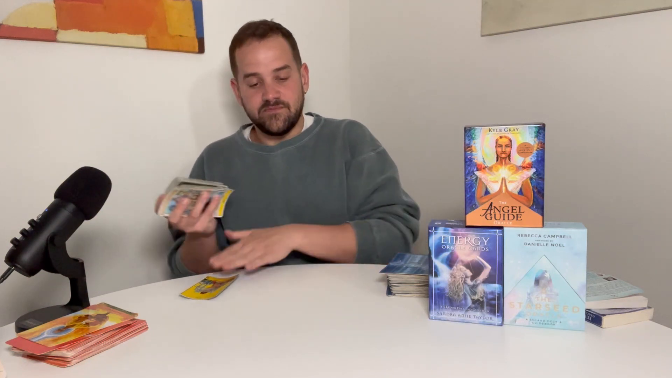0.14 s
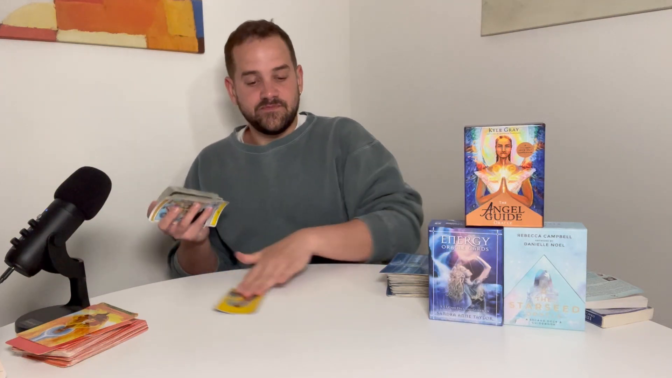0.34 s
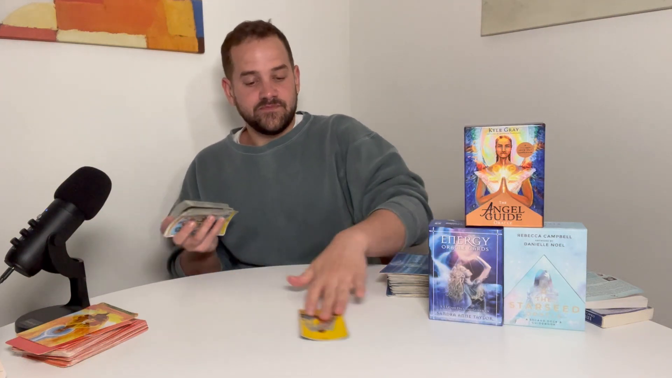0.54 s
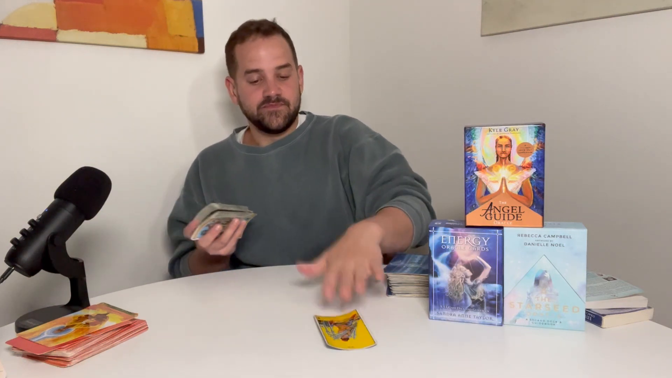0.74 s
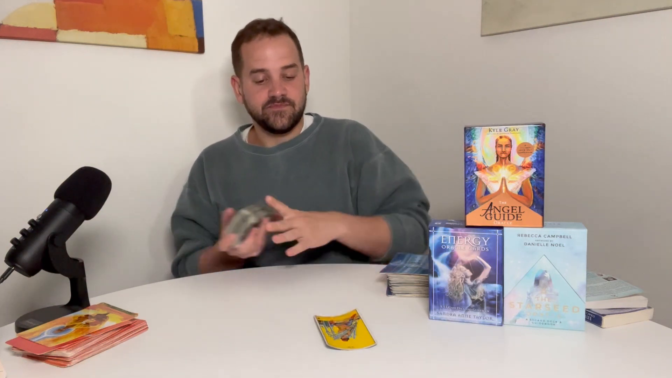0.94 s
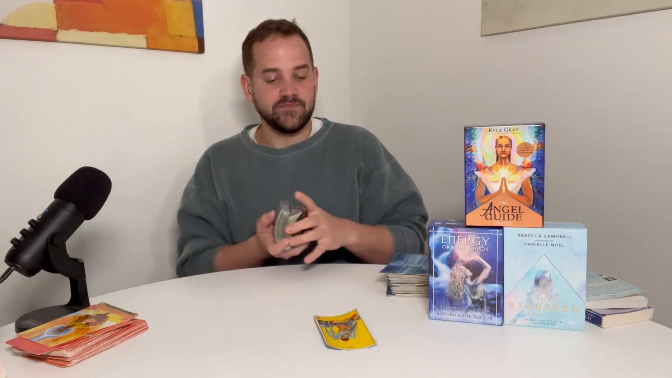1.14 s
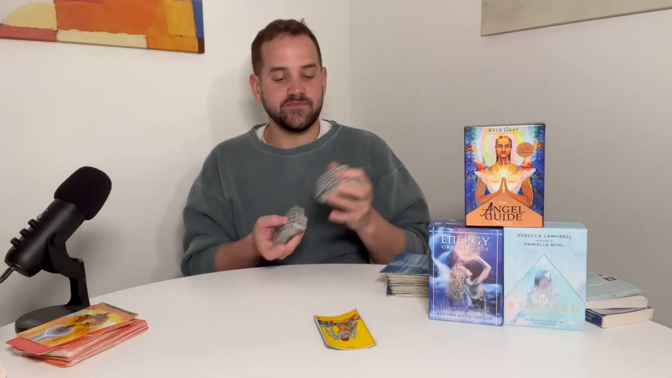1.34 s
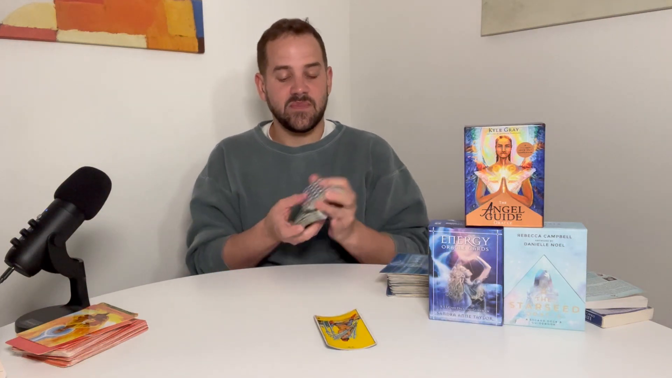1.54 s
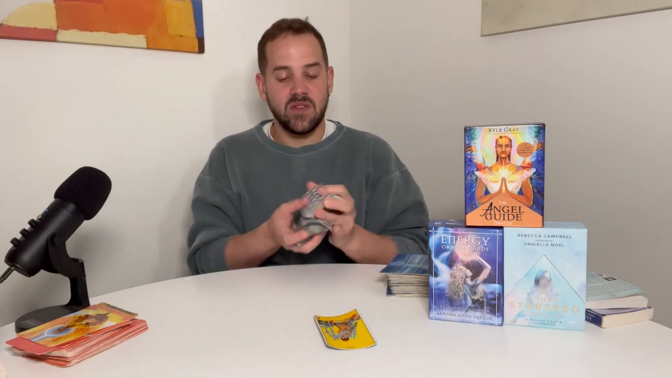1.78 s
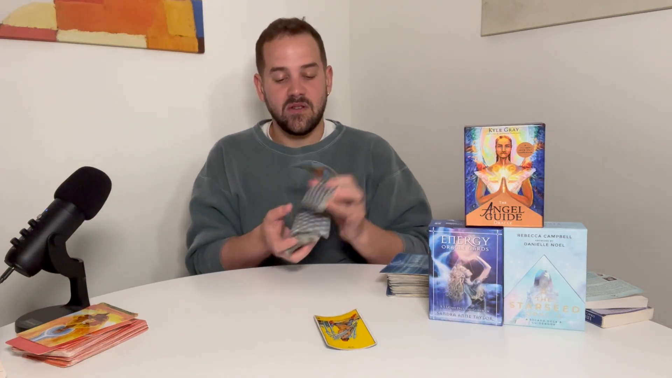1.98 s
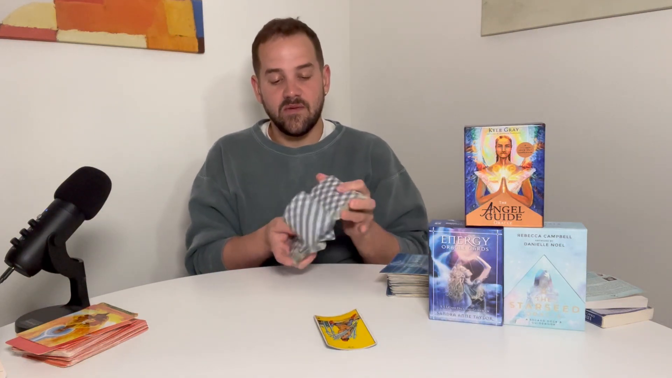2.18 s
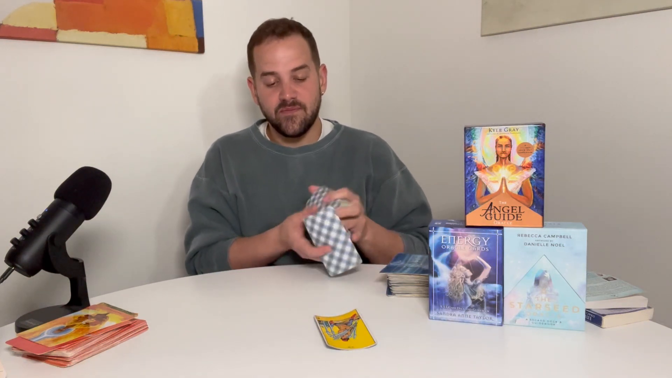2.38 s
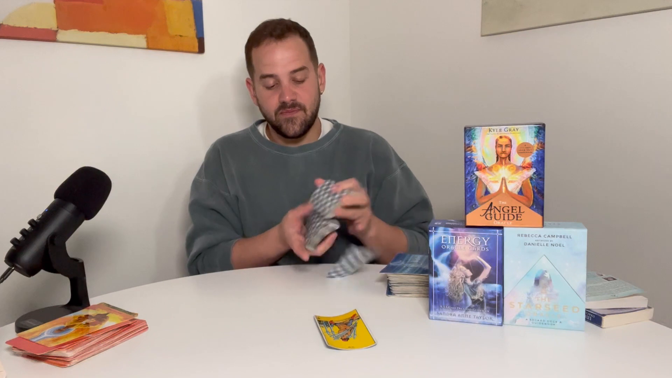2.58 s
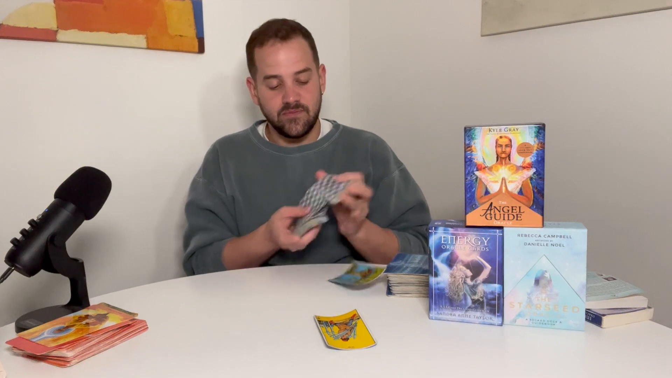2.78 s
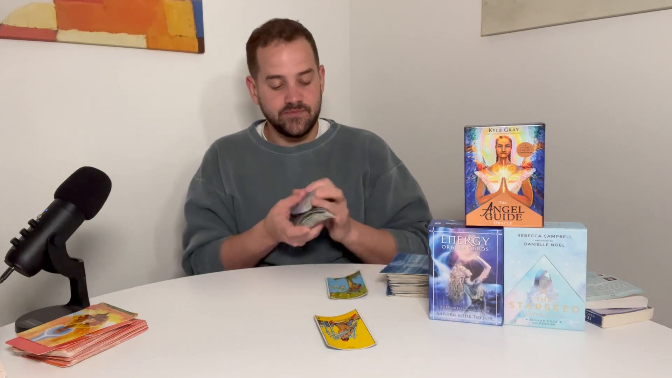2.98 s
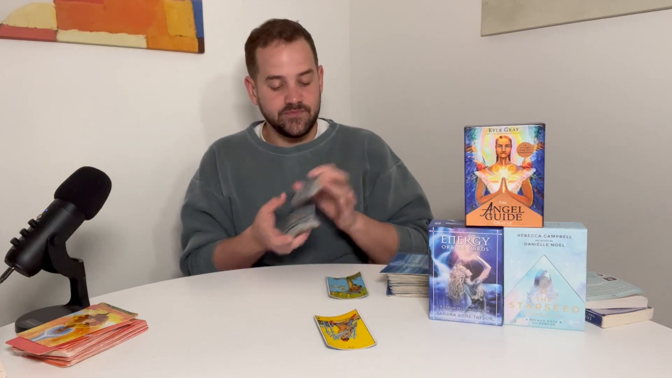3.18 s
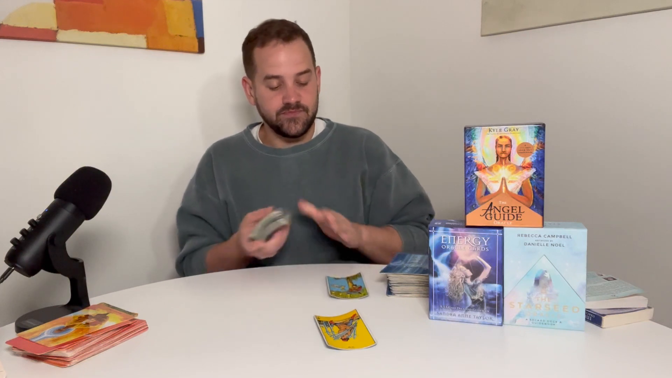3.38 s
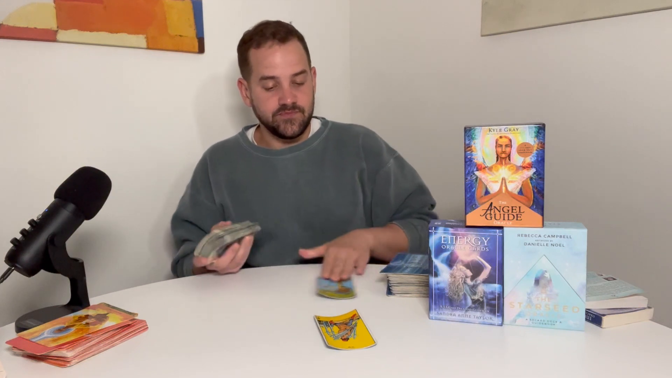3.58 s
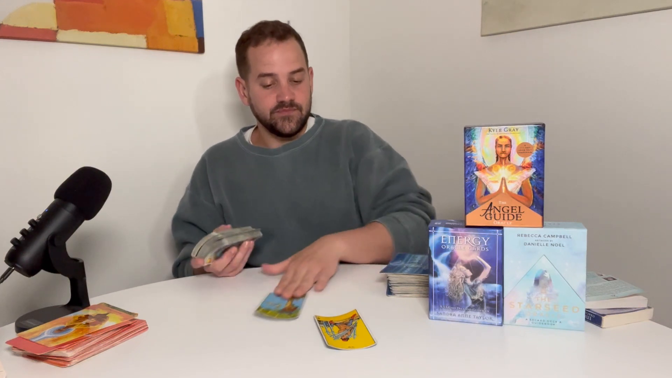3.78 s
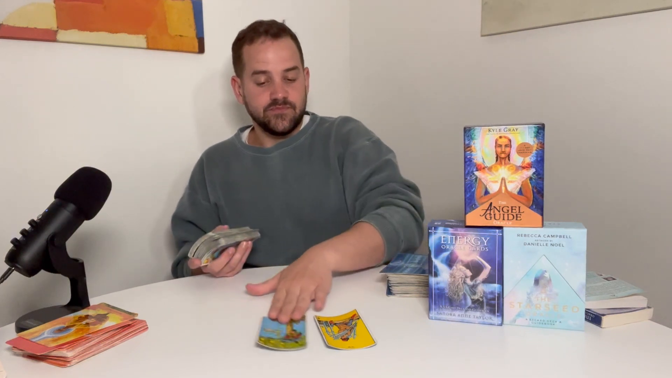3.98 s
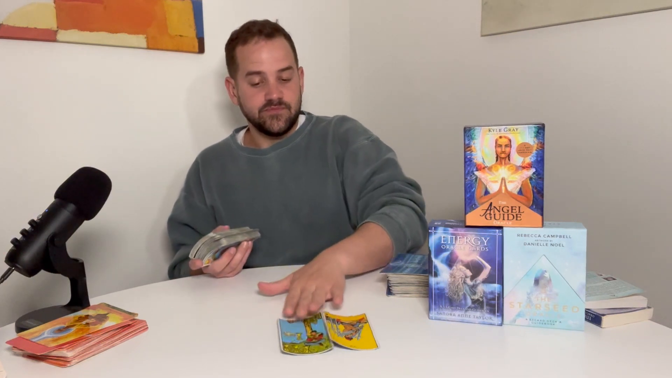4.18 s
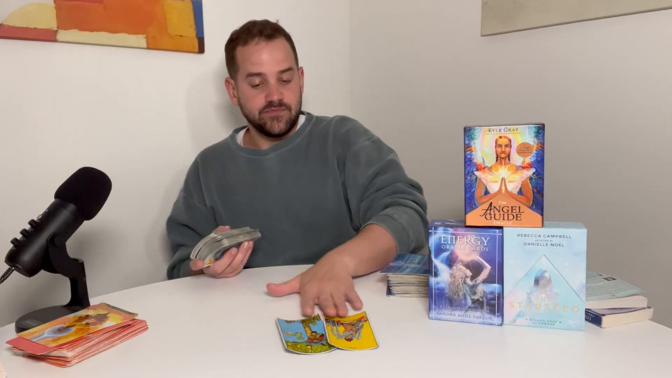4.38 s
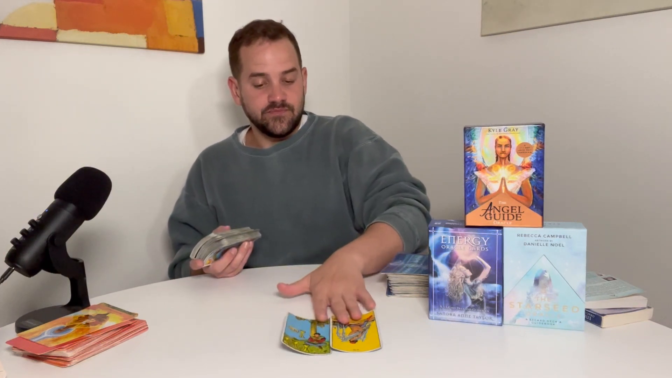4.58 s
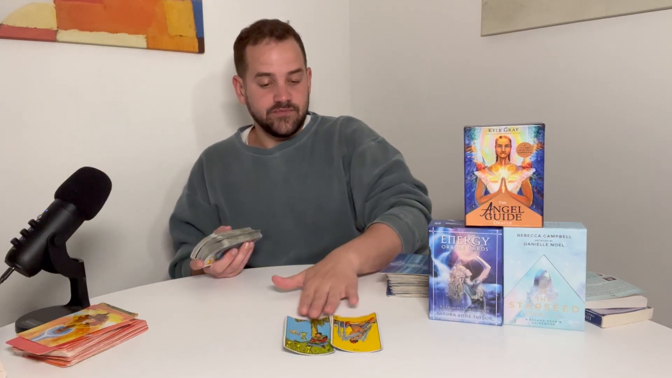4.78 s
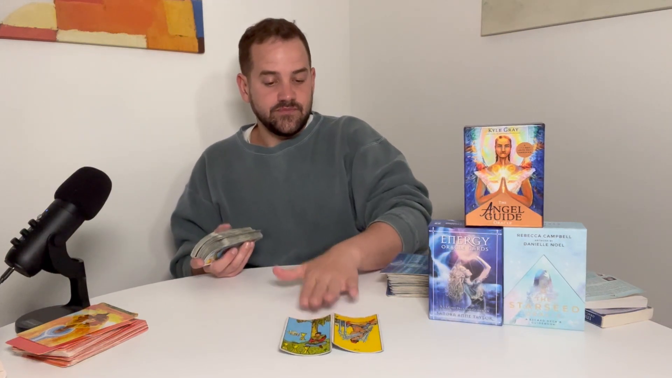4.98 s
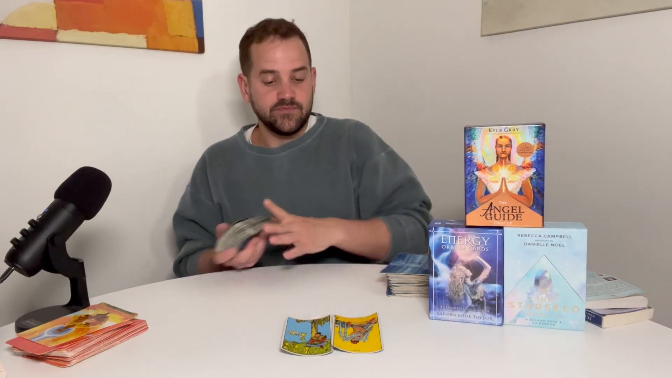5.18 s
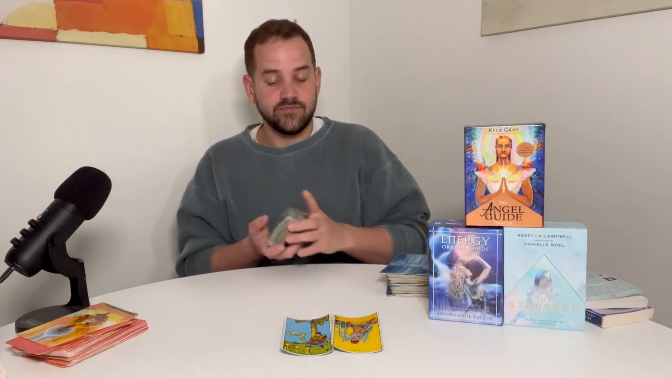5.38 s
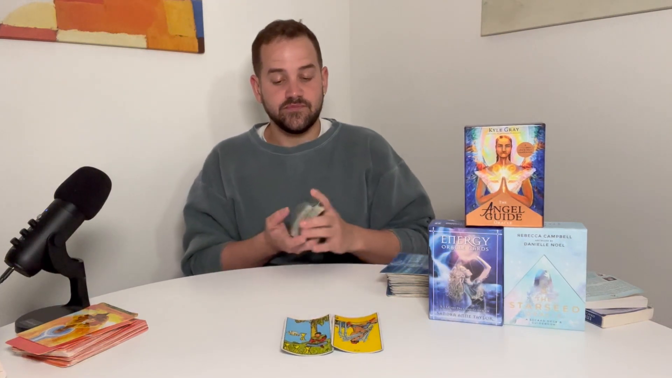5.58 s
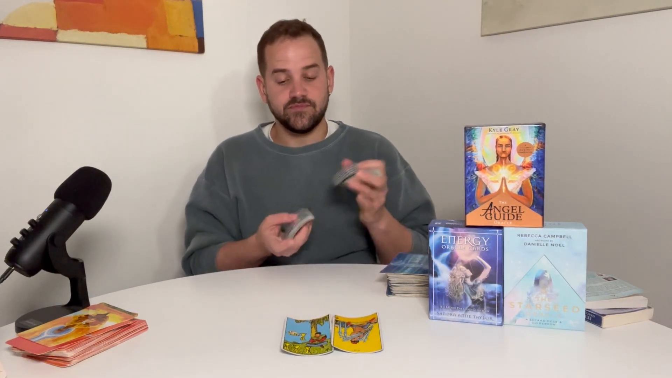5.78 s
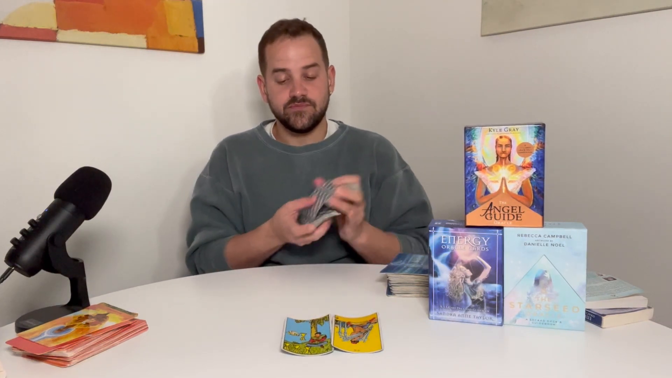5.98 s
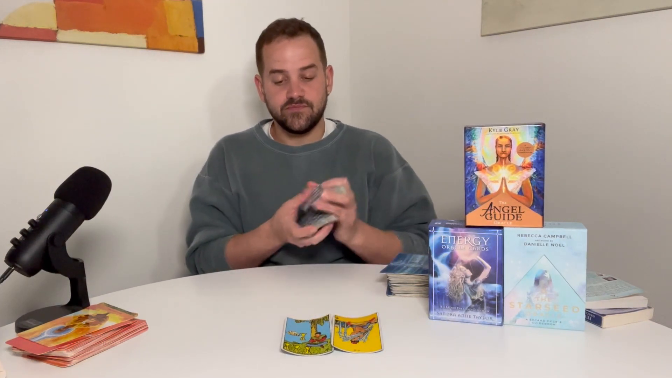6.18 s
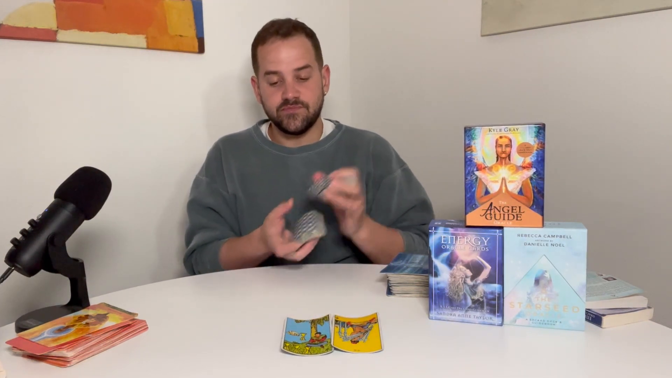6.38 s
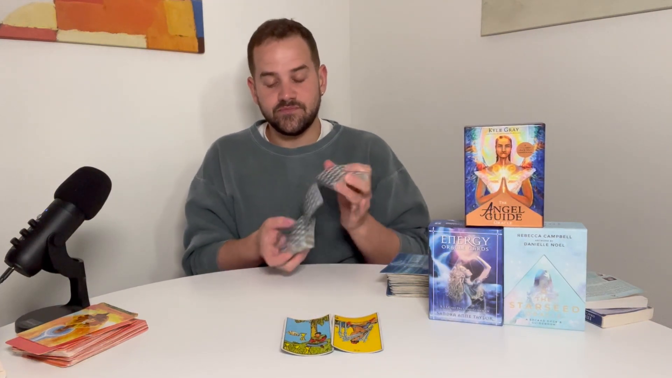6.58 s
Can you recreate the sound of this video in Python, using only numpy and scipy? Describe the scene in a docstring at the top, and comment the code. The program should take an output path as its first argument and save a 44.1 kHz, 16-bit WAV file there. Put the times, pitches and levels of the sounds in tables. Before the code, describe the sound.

Stiff cards clack, riffle and scrape between hands in quick bursts, with hissing slides and dull table knocks, close in a small quiet room.

```python
"""Stiff cards snap, hiss and scrape as hands shuffle them over a table that knocks and booms.
Blows ring the hollow between the packets, crack at the edges and push air; a short echo returns them.
Coloured friction noise makes the rubbing, and singing noise the dragged edges.
Table modes, a thud and a slow sway make the knocks, over a low rumble of moving arms.
A quiet room hums, and a faint far tone glides up and down."""
import sys
import numpy as np
from scipy import signal
from scipy.fft import rfft, irfft, next_fast_len
from scipy.io import wavfile
from scipy.ndimage import uniform_filter1d

SR = 44100
rng = np.random.default_rng(int(sys.argv[2]) if len(sys.argv) > 2 else 0)


def put_to_file(sound):
    """Save the sound as 16-bit audio at rate SR, in the file named by the first command-line argument."""
    columns = np.atleast_2d(sound).T  # one column per channel
    safe = np.clip(columns, -1, 1)
    whole_steps = np.round(safe * 32767)
    wavfile.write(sys.argv[1], SR, whole_steps.astype(np.int16))


def amplitude_ratio(level_db):
    """Convert a level in decibels to the matching linear amplitude (field) ratio."""
    exponent = np.asarray(level_db, float) / 20
    return 10 ** exponent


N = 292824

# Colour of the room air. Each row: frequency in Hz, relative density in dB per Hz.
ROOM_COLOUR = [(53, -24.5), (90, -2.5), (125, -0.5), (200, -7), (470, -4.5), (640, -19), (1000, -24.5),
               (1900, -29.5), (3000, -33), (5000, -34), (8000, -37.5), (11000, -32.5), (14500, -34.5),
               (16500, -51)]
ROOM_DB = -57  # rms
# Partials of the room hum. Each row: frequency in Hz, rms level in dB.
HUM_PARTIALS = [(120, -62), (239, -80.5), (387.6, -71.5), (479.1, -77), (737.5, -71)]

# First pass of the far tone. Each row: time in seconds, pitch in Hz, level in dB.
EARLY_TONE = [(0, 1380, -60), (.5, 1402, -78), (.7, 1657, -68), (.9, 1603, -71), (1.2, 1625, -77.5)]
# Later pass of the far tone. Each row: time in seconds, pitch in Hz, level in dB.
LATE_TONE = [(3.8, 1205, -68), (4.0, 1360, -68), (4.15, 1470, -68), (4.3, 1550, -68.5), (4.5, 1625, -68.5),
             (4.8, 1660, -69), (5.27, 1675, -69), (5.36, 1500, -69), (5.6, 1383, -69), (5.9, 1230, -68)]

# Arms and hands shaking the table. Each row: time in seconds, rms level in dB.
SHAKE_LEVEL = [(0, -60.5), (.17, -66), (.22, -43), (.42, -52), (.76, -58), (1.31, -60), (1.53, -62),
               (2.25, -63), (2.42, -38.5), (2.55, -49.5), (3.22, -54.5), (3.47, -70), (3.54, -37.5),
               (3.72, -44), (3.9, -53.5), (4.55, -57.5), (5.05, -58), (5.12, -46.5), (5.3, -55.5),
               (5.37, -51), (5.71, -55.5), (5.94, -52.5), (6.3, -60), (6.64, -56)]
# Colour of that rumble. Each row: frequency in Hz, relative density in dB per Hz.
SHAKE_COLOUR = [(10, 6), (28, 8), (45, 0.5), (76, 3.5), (110, -7.5), (170, -42)]
# Knocks on the table top. Each row: start in seconds, boom level in dB, upper ring level in dB,
# level of the stand's sway in dB, thud level in dB.
KNOCKS = [(0.2065, -37, -35.5, -28.5, -30.5), (2.2545, -18.5, -14, -37, -42), (2.412, -24, -17, -44.5, -44),
          (2.621, -35, -36, -56, -62), (2.903, -33, -29, -59, -42), (3.5033, -23.5, -33, -32, -29),
          (3.771, -50, -65, -29.5, -60), (4.227, -47.5, -62.5, -59.5, -59), (4.927, -56, -56, -43, -62.5),
          (5.088, -38, -42.5, -30.5, -52), (5.342, -38.5, -47, -37, -52), (5.517, -48, -57.5, -41.5, -60),
          (6.509, -52, -28, -60, -55)]
# Modes of the table top. Each row: frequency in Hz, level relative to the knock in dB, t60 in seconds.
TABLE_MODES = [(76.3, -8.5, 0.5), (112.9, -8.5, 0.36), (159.4, -3, 0.12), (271, -17, 0.11),
               (379, -14.5, 0.15), (482, -21, 0.297)]
SWAY_HZ, SWAY_T60, SWAY_RISE = 22.1, 0.66, 0.017  # Hz, s, s: the stand rocks slowly and builds up
THUD_HZ, THUD_T60, THUD_RISE = 88.6, 0.11, 0.0025  # Hz, s, s: the fingertip's dull push into the top

# Colour of smooth faces rubbing. Each row: frequency in Hz, relative density in dB per Hz.
HISS_COLOUR = [(710, -51), (1200, -19.5), (1380, -25.5), (2450, -11.5), (3080, -6), (4240, -5), (8730, -2),
               (15100, -4.5), (16000, -25), (16500, -47.5)]
# Colour of edges catching. Each row: frequency in Hz, relative density in dB per Hz.
SCRAPE_COLOUR = [(500, 1), (900, 1), (1500, 6), (2200, 1.5), (3000, 3), (4200, -3), (5200, -10),
                 (7000, -10), (10000, -34), (15000, -38)]
# The deck held in restless fingers. Each row: time in seconds, hiss level in dB, scrape level in dB.
HOLD = [(0, -68, -55.5), (.3, -58, -57.5), (.8, -70.5, -65), (1.4, -76, -63.5), (2, -72.5, -53),
        (2.53, -75.5, -57.5), (3, -74, -54.5), (3.45, -65, -59), (4.3, -77, -77.5), (5.1, -75.5, -73),
        (5.85, -72, -58.5), (6.15, -83, -55.5), (6.64, -72, -50)]
# A card pushed across the table top, twice: one list of rows per push.
# Each row: time in seconds, hiss level in dB, scrape level in dB.
SLIDES = [
    [(.172, -67, -69), (.19, -58, -57), (.214, -39.5, -57), (.257, -33, -57), (.335, -34.5, -56),
     (.36, -31.5, -58.5), (.382, -36, -55), (.42, -32.5, -52), (.432, -29, -53), (.445, -30, -50),
     (.478, -33, -53), (.5, -38.5, -51.5), (.635, -50, -60), (.708, -64.5, -68), (.86, -73.5, -70)],
    [(3.52, -61, -54), (3.58, -41.5, -62), (3.656, -36.5, -59.5), (3.751, -41.5, -71), (3.857, -37.5, -58),
     (3.961, -42.5, -62.5), (4.165, -57, -62.5), (4.2, -66.5, -66.5), (4.29, -75.5, -72)],
]
# Packets brushing past each other. Each row: peak time in seconds, seconds to rise the last 20 dB,
# seconds to fall 20 dB (the sign of either is ignored), hiss level in dB, scrape level in dB.
STROKES = [(.922, 0.14, 0.5, -61, -69), (.98, 0.15, 0.5, -69, -59), (1.04, 0.07, 0.23, -54.5, -53.5),
           (1.316, 0.12, 0.04, -52.5, -52), (1.47, 2, 4.5, -69, -72.5), (1.55, 0.12, 0.21, -49, -64),
           (1.604, 0.07, 0.22, -38.5, -42), (1.668, 0.04, 0.34, -47, -42.5), (1.749, 0, 0.06, -27.5, -25.5),
           (1.842, 0.07, -0.01, -37.5, -39), (2.018, .014, .045, -31, -33), (1.93, -0.2, 0.3, -62, -50),
           (2.075, 0.27, -0.2, -49, -44.5), (2.185, 0, -0.3, -69.5, -57), (2.33, 0.17, 0.28, -50.5, -41),
           (2.39, .03, .15, -54, -54), (2.425, .015, .09, -57, -45), (2.596, .045, .04, -43, -56),
           (2.628, .04, .05, -50, -40), (2.69, .05, .05, -56, -58), (2.745, .02, .15, -46.5, -49),
           (2.805, .02, .08, -48, -45), (2.96, 0.14, 0.08, -62, -45), (3.03, 0.36, 0.12, -49, -54),
           (3.082, .025, .06, -45, -38), (3.226, .015, .12, -46, -40), (3.288, .12, .025, -45, -52),
           (4.42, -0.3, 0.2, -63.5, -73), (4.57, 0.3, 0.08, -57, -61), (4.82, -1.5, 0.4, -67.5, -67),
           (4.98, 0.1, 0.5, -68, -70.5), (5.089, 0.0329, -0.32, -60.5, -54.5),
           (5.27, 0.04, 0.18, -52.5, -56.5), (5.476, 0.15, 0.7, -62, -58), (5.625, .05, .08, -57, -58),
           (5.67, .03, .05, -55, -54), (5.72, .05, .07, -54, -50), (5.94, .045, .05, -49, -48),
           (5.975, .03, .08, -50, -54.5), (6.022, .03, .06, -42, -33), (6.19, .022, .04, -43, -45),
           (6.23, .04, .05, -52, -52), (6.272, .02, .07, -30, -32), (6.445, .04, .06, -47, -55),
           (6.505, .08, .02, -39, -50), (6.535, .03, .07, -37, -40), (6.621, .012, .06, -43, -39) ]
ROUNDNESS = 1.12  # 1 = pointed strokes, 2 = round
SETTLE_DB, SETTLE_T60 = -21.5, .12  # dB relative to the blow, s: packets scrape into place

# Cards striking cards. Each row: start in seconds, hollow level in dB, pitch the hollow settles to in Hz,
# edge crack level in dB, level of the flap of air in dB; levels are peaks ahead of the low cuts.
SNAPS = [(0.1866, -46.5, 2260, -32, -45), (0.2007, -30.5, 1690, -26, -35), (0.2015, -29, 2660, -14.5, -43),
         (0.361, -48, 3700, -27, -58.5), (.391, -35, 3600, -26.5, -58), (.42, -29, 2200, -25.5, -64),
         (0.438, -34, 3680, -20.5, -58.5), (0.447, -25, 3040, -26, -44), (0.4765, -32, 3420, -29.5, -63.5),
         (0.9781, -32, 2660, -27, -59), (1.0514, -34, 1750, -25.5, -45), (1.067, -35, 1700, -53, -59.5),
         (1.301, -35.5, 3660, -33, -59), (1.3113, -35.5, 2970, -37, -68), (1.3217, -29, 1190, -30, -36),
         (1.499, -22, 1500, -21.5, -35.5), (1.522, -26, 3350, -24, -50), (1.527, -23.5, 1280, -42, -32),
         (1.574, -28, 1250, -25.5, -33.5), (1.5925, -30, 2930, -23, -39), (1.601, -42, 2600, -41, -26.5),
         (1.612, -19, 2500, -28.5, -25), (1.617, -9.5, 2500, -27.5, -19.5), (1.6212, -1, 1320, -1.5, -14),
         (1.6268, -16, 1570, -25, -36.5), (1.63, -11, 1590, -17, -39.5), (1.6475, -20, 2620, -4.5, -23.5),
         (1.6503, -17.5, 3696, -20, -25), (1.6537, -22, 1447, -11, -21.5), (1.705, -29.5, 1450, -33, -30.5),
         (1.724, -21, 3440, -24, -21.5), (1.7398, -25, 1500, -19, -26), (1.7419, -14, 2080, -19.5, -36),
         (1.7455, -30, 3000, -11, -35), (1.7492, -30, 3400, -12, -37), (1.7505, -12, 1500, -30, -19),
         (1.7548, -9.5, 3260, -1.5, -24), (1.7633, -14, 1470, -26, -24), (1.8445, -26.5, 2400, -18, -28.5),
         (1.8482, -24, 2120, -40, -24.5), (1.8544, -28.5, 1370, -30, -55), (1.977, -36.5, 1890, -49.5, -45),
         (1.9943, -19, 3470, -28, -30), (2.01, -17, 1970, -27.5, -32), (2.0145, -9, 1690, -2, -19),
         (2.0228, -21, 2897, -25, -36), (2.03, -17.5, 1780, -33.5, -24),
         (2.0988, -27.5, 1590, -23.5, -36.5), (2.144, -36, 1790, -44.5, -37),
         (2.176, -32, 1850, -40, -43.5), (2.1813, -28, 1900, -50, -37), (2.208, -36, 3570, -45.5, -52.5),
         (2.239, -36, 2930, -35, -43), (2.2544, -9.5, 1710, -24, -11.5), (2.2565, -8.5, 2900, -38.5, -13),
         (2.2597, -15.5, 1270, -28, -17.5), (2.272, -25.5, 2880, -39.5, -20), (2.3004, -25, 2170, -40, -24),
         (2.3157, -23.5, 3287, -25, -29), (2.3181, -14.5, 1480, -29, -22), (2.3263, -28, 1530, -25, -33),
         (2.413, -32.5, 910, -43, -24.5), (2.4196, -28, 1440, -45, -22), (2.4532, -39.5, 2380, -29, -32.5),
         (2.5558, -35.5, 3220, -36, -45), (2.6088, -30, 3000, -38, -50), (2.6141, -21.5, 1660, -21, -38),
         (2.625, -15, 3040, -39, -37), (2.634, -25, 3100, -42, -49), (2.679, -42, 3200, -43.5, -48),
         (2.739, -35, 1610, -33.5, -41), (2.7982, -29.5, 2640, -43.5, -47.5), (2.81, -32, 3150, -43.5, -51),
         (2.818, -36.5, 3350, -42.5, -47), (2.8236, -22, 2800, -36, -33), (2.8363, -16, 1000, -19, -23.5),
         (2.838, -17.5, 1110, -15, -22.5), (2.903, -28, 1140, -27, -30), (2.9505, -28, 1530, -23, -57),
         (2.9576, -23.5, 1620, -22, -30.5), (2.9814, -33, 3200, -27, -45), (2.997, -40.5, 1700, -47.5, -51),
         (3.0217, -36, 3120, -41, -43), (3.0754, -29.5, 2580, -34.5, -34), (3.0803, -20, 2600, -32.5, -35),
         (3.0874, -26, 2700, -33, -33), (3.0952, -18, 1650, -16, -29), (3.102, -27, 1510, -21, -34),
         (3.191, -31.5, 1300, -28, -29.5), (3.2202, -33.5, 2780, -23, -34), (3.2401, -28, 3030, -33.5, -36),
         (3.273, -33, 3680, -37, -59), (3.4938, -36.5, 1500, -31, -35), (3.4984, -39, 900.5, -25, -36),
         (3.5038, -35, 3900, -21, -36.5), (4.24, -49, 2670, -43.5, -66.5), (4.574, -45, 3760, -40, -60.5),
         (4.807, -55.5, 1700, -43, -63), (4.9754, -49, 3160, -41, -61), (5.085, -43, 1730, -34, -57.5),
         (5.17, -61, 2510, -45.5, -58.5), (5.27, -58, 1590, -39, -61.5), (5.4039, -45, 1510, -48, -54),
         (5.48, -42, 2760, -47, -53.5), (5.5093, -43, 1600, -45, -59), (5.668, -37, 1710, -32.5, -49),
         (5.699, -37, 1680, -36.5, -51), (5.7212, -32, 1680, -29, -40), (5.9303, -30, 1320, -33, -35),
         (5.9385, -25, 2000, -23, -42.5), (5.9446, -23.5, 2880, -29, -35), (5.952, -32, 1490, -28, -54),
         (5.989, -33, 3060, -38, -30), (5.9916, -7.5, 2900, -18.5, -36), (5.9922, -8.5, 1600, -18, -34),
         (5.9983, -14, 2420, -15, -31), (6.0095, -27.5, 1600, -32.5, -26), (6.018, -17.5, 2900, -26.5, -31),
         (6.0206, -16.5, 3120, -15, -31), (6.0233, -18.5, 900, -30, -24.5), (6.0278, -25, 3210, -18, -25.5),
         (6.18, -29, 1700, -26.5, -38), (6.193, -25.5, 2500, -20, -33), (6.2493, -17, 2400, -13.5, -18),
         (6.2551, -12.5, 1380, -12, -8.5), (6.2623, -11.5, 1350, -16, -28), (6.2692, -8.5, 2820, -13, -23),
         (6.272, -7, 1555, -23, -23), (6.278, -6.5, 1470, -19, -12.5), (6.2846, -14, 1610, -0.5, -21.5),
         (6.291, -21, 1640, -11, -48.5), (6.3, -26, 1590, -24, -46), (6.3107, -28, 1590, -21, -46.5),
         (6.432, -41, 2000, -36, -55), (6.4432, -37, 2501, -25, -43), (6.4477, -33, 1640, -27, -41.5),
         (6.509, -10.5, 1290, -39, -20), (6.515, -25, 1010, -16, -20.5), (6.5234, -20.5, 2720, -2.5, -16.5),
         (6.532, -9.5, 1350, -6, -13.5), (6.6147, -36, 899.6, -38, -29.5),
         (6.6202, -13.5, 1270, -16.5, -29)]
LEAD = .008  # seconds of run-up before each blow
CHATTER_T60, CHATTER_POWER = 0.017, 0.29  # seconds on a 1500 Hz hollow; a higher hollow chatters less

# Decay of the echo. Each row: frequency in Hz, t60 in seconds.
ECHO_DECAY = [(250, 0.34), (1000, 0.33), (2000, 0.21), (4000, 0.27), (8000, 0.25), (14000, 0.31)]
# Colour of the echo: fullest in the lows, with some treble. Each row: frequency in Hz, relative level in dB.
ECHO_COLOUR = [(250, 5), (1500, 1), (4000, 2), (7000, 3.5), (12000, 0.5)]
ECHO_DB = -13.5

# Edges dragged across the cupped deck. Each row: start in seconds, end in seconds, pitch at start in Hz,
# pitch at end in Hz, level ahead of the fade in dB.
DRAGS = [(1.63, 1.711, 1540, 1440, -34.5), (1.859, 1.93, 1970, 1990, -49), (1.927, 2.007, 2000, 1940, -46),
         (1.879, 2.0, 3650, 3600, -53), (2.61, 2.655, 1800, 1650, -35), (2.627, 2.691, 3200, 2930, -42),
         (2.795, 2.833, 2690, 3330, -40), (2.984, 3.006, 1650, 1700, -44.5),
         (3.069, 3.091, 2694, 2785, -37), (3.223, 3.26, 2900, 3200, -40), (5.996, 6.024, 1580, 1560, -32),
         (6.255, 6.282, 1400, 1630, -17), (6.283, 6.348, 1700, 1620, -28),
         (6.531, 6.552, 1460, 1520, -22.5), (6.573, 6.633, 1500, 1490, -46)]
DRAG_FADE_DB = -14  # reached at the end of the drag

# Overall treble roll-off. Each row: frequency in Hz, gain in dB.
TREBLE_ROLL_OFF = [(20, -0.5), (9000, -0.5), (12000, -8.5), (15500, -12), (16100, -20.5), (16600, -44.5)]


def evened(x):
    """Scales to unit rms."""
    return x / np.sqrt(np.mean(x ** 2) + 1e-20)


def peaked(x):
    """Scales to unit peak."""
    return x / (abs(x).max() + 1e-20)


def read(points, hz):
    """Reads a spectrum on a log-frequency axis."""
    f, value = np.transpose(points)
    return np.interp(np.log(hz + 1), np.log(f + 1), value)


def colour(x, points):
    """Filters by a spectrum, to unit rms."""
    size = next_fast_len(len(x))
    gain = amplitude_ratio(read(points, np.fft.rfftfreq(size, 1 / SR)))
    return evened(irfft(rfft(x, size) * gain, size)[:len(x)])


def curve(rows, column):
    """One column of a curve table at every sample."""
    return np.interp(np.arange(N) / SR, [r[0] for r in rows], [r[column] for r in rows])


def add(mix, s, sound):
    """Mixes a sound in at a time."""
    part = mix[round(s * SR):][:len(sound)]
    part += sound[:len(part)]


def smoothed(x, size):
    """Two running means, for slow random movement."""
    return uniform_filter1d(uniform_filter1d(x, size), size)


def resonate(x, hz, width):
    """A resonance: shifts hz down to zero, smooths, and shifts back."""
    turn = np.exp(2j * np.pi * np.cumsum(hz * np.ones(len(x))) / SR)
    r = np.exp(-np.pi * abs(width) / SR)
    return 2 * (turn * signal.lfilter([1 - r], [1, -r], x / turn)).real


def room():
    """Air noise and a hum whose partials waver, the higher ones more."""
    noise = rng.standard_normal(N)
    hum = np.zeros(N)
    for hz, db in HUM_PARTIALS:
        steady = np.sin(2 * np.pi * hz * np.arange(N) / SR)
        waver = hz / 400 * evened(resonate(noise, hz, hz / 40))
        hum += amplitude_ratio(db) * evened(steady + waver)
    return amplitude_ratio(ROOM_DB) * colour(rng.standard_normal(N), ROOM_COLOUR) + hum


def far_tone():
    """A gliding tone, blurred by distance: a sine within narrow noise at the same pitch."""
    out = np.zeros(N)
    for rows in (EARLY_TONE, LATE_TONE):
        s, hz, db = np.transpose(rows)
        t = np.arange(s[0], s[-1], 1 / SR)
        hz = np.interp(t, s, hz)
        blur = evened(resonate(resonate(rng.standard_normal(len(t)), hz, 60), hz, 100))
        tone = evened(blur + .6 * np.sin(2 * np.pi * np.cumsum(hz) / SR))
        add(out, s[0], amplitude_ratio(np.interp(t, s, db)) * tone * signal.windows.tukey(len(t), .15))
    return out


def table():
    """Each knock thuds, rings the modes of the top and rocks the stand; moving arms add a low rumble."""
    out = colour(rng.standard_normal(N), SHAKE_COLOUR) * amplitude_ratio(curve(SHAKE_LEVEL, 1))
    t = np.arange(SR // 2) / SR
    sway_swell = amplitude_ratio(-60 * t / SWAY_T60) * (1 - np.exp(-(t / SWAY_RISE) ** 2))
    sway = sway_swell * np.sin(2 * np.pi * SWAY_HZ * t)
    thud_swell = amplitude_ratio(-60 * t / THUD_T60) * (1 - np.exp(-t / THUD_RISE))
    thud = peaked(thud_swell * np.sin(2 * np.pi * THUD_HZ * t))
    for s, boom_db, ring_db, sway_db, thud_db in KNOCKS:
        add(out, s, amplitude_ratio(sway_db) * sway + amplitude_ratio(thud_db) * thud)
        for hz, db, t60 in TABLE_MODES:
            level_db = (boom_db if hz < 130 else ring_db) + db
            rise = 1 - np.exp(-t * hz / (THUD_HZ * THUD_RISE))  # higher modes start faster
            add(out, s, amplitude_ratio(level_db - 60 * t / t60) * rise * np.sin(2 * np.pi * hz * t))
    return out


def grit(spread_db, flutter_db, span):
    """Friction: noise whose grains vary in size and whose level flutters over span seconds."""
    grains = amplitude_ratio(spread_db * np.minimum(rng.exponential(1, N), 5))
    flutter = evened(smoothed(rng.standard_normal(N), round(span * SR)))
    return rng.standard_normal(N) * grains * amplitude_ratio(flutter_db * flutter)


def patchy(x, patchy_db):
    """Random patches of time and pitch grow louder or softer."""
    z = signal.stft(x, nperseg=256)[2]
    patches = uniform_filter1d(rng.standard_normal(z.shape), size=8, axis=0)
    patches = evened(uniform_filter1d(patches, size=10, axis=1))
    return signal.istft(z * amplitude_ratio(patchy_db * patches), nperseg=256)[1][:N]


def contact(column):
    """Rubbing power at every sample (column 1 hiss, 2 scrape): the held deck, slides and strokes."""
    t = np.arange(N) / SR
    power = amplitude_ratio(2 * curve(HOLD, column))
    for rows in SLIDES:
        power += amplitude_ratio(2 * curve(rows, column)) * (t > rows[0][0]) * (t < rows[-1][0])
    for row in STROKES:
        peak, rise, fall = row[:3]
        near = slice(max(round((peak - .5) * SR), 0), round((peak + .5) * SR))
        before, after = (peak - t[near]) / abs(rise), (t[near] - peak) / abs(fall)
        away = np.where(t[near] < peak, before, after)
        power[near] += amplitude_ratio(2 * (row[2 + column] - 20 * away ** ROUNDNESS))
    return power


def settling():
    """Power of the dying scrape after each blow, and the hollow (Hz) left by the latest strong blows."""
    blows = np.zeros((2, N))  # power, and pitch weighted by power
    blows[:, 0] = 1e-9, 1e-9 * SNAPS[0][2]
    for s, db, hz, *_ in SNAPS:
        blows[:, round(s * SR)] += amplitude_ratio(2 * (db + SETTLE_DB)) * np.array([1, hz])
    power, weighted = signal.lfilter([1], [1, -amplitude_ratio(-2 * 60 / (SETTLE_T60 * SR))], blows)
    return power, weighted / power


def rubbing():
    """Smooth faces hiss; catching edges scrape and ring the hollow, most as the deck settles after a blow."""
    hiss = colour(patchy(grit(2.2, 1.54, 0.0028), patchy_db=2.0), HISS_COLOUR) * np.sqrt(contact(column=1))
    scrape = colour(patchy(grit(4.17, 1.67, 0.012), patchy_db=1.5), SCRAPE_COLOUR)
    settle, hz = settling()
    rub = contact(column=2)
    wander = evened(smoothed(rng.standard_normal(N), 500))
    hz = hz * (1 + .04 * wander)  # the hollow shifts as the fingers close
    ringing = resonate(resonate(scrape, hz, 220), hz, 600)
    ringing = ringing + 0.57 * resonate(resonate(scrape, 1.8 * hz, 500), 2.1 * hz, 900)
    ringing = evened(ringing) * np.sqrt(0.027 * rub + 0.27 * settle)
    return hiss + scrape * np.sqrt(rub + settle) + ringing


def snaps():
    """A blow and a dying chatter ring the hollow between the packets, crack at the edges and push air."""
    out, t = np.zeros(N), np.arange(3000) / SR - LEAD
    after = np.maximum(t, 0)
    blow = (t >= 0) * (1 - after / .00008) * np.exp(-after / .00008)
    sag = 1 + 0.5 * np.exp(-after / 0.00025)  # the hollow drops in pitch as the packets bend
    for (s, db, hz, edge_db, flap_db), noise in zip(SNAPS, rng.standard_normal((len(SNAPS), 3000))):
        t60 = CHATTER_T60 * (1500 / hz) ** CHATTER_POWER
        dying = amplitude_ratio(-60 * after / np.clip(t60, .003, .15))
        chatter = np.where(t < 0, np.exp(t / 0.00037), dying)
        drive = blow + 0.061 * noise ** 3 * chatter  # cubed noise: separate small ticks
        hollow = resonate(resonate(drive, hz * sag, 560), hz * sag, 1800)
        hollow = hollow + 0.44 * resonate(resonate(drive, 1.9 * hz, 830), 2.48 * hz, 2000)
        # the edges crackle on longer than the faces chatter
        edge_chatter = np.where(t < 0, chatter, chatter ** .85)
        crackle = np.diff(blow + .07 * noise * abs(noise) * edge_chatter, prepend=0)
        edge = resonate(resonate(crackle, 4900, 4500), 6800, 2800)
        edge = edge + 0.39 * resonate(resonate(crackle, 12000, 3900), 11000, 7200)
        flap = resonate(resonate(drive, 430, 360), 480, 830)
        flap = flap + 0.63 * resonate(resonate(drive, 795.0, 130), 823.0, 250)
        flap = flap - 0.9 * resonate(resonate(drive, 140, 110), 140, 230)
        snap = amplitude_ratio(db) * peaked(hollow) + amplitude_ratio(edge_db) * peaked(edge) + amplitude_ratio(flap_db) * peaked(flap)
        add(out, s - LEAD, snap)
    return out


def echo(x):
    """Sparse taps of random sign, each band dying at its own speed."""
    taps = np.zeros(SR // 2)
    at = np.arange(200, SR // 2 - 20, 20)
    taps[at + rng.integers(0, 20, len(at))] = rng.choice([-1., 1.], len(at))
    hz, t, z = signal.stft(taps, SR, nperseg=256)
    decay_db = read(ECHO_COLOUR, hz)[:, None] - 60 * t / read(ECHO_DECAY, hz)[:, None]
    tail = signal.istft(z * amplitude_ratio(decay_db), SR, nperseg=256)[1]
    return signal.fftconvolve(x, tail / np.linalg.norm(tail))[:N]


def drags():
    """Noise sings in the hollow and its overtone, fading as the edge slips off."""
    out = np.zeros(N)
    for start, end, hz0, hz1, db in DRAGS:
        u = np.linspace(0, 1, max(round((end - start) * SR), 99))
        hz = hz0 + (hz1 - hz0) * u
        noise = rng.standard_normal(len(u)) ** 3
        sing = resonate(resonate(noise, hz, 280), hz, 600)
        sing = sing + 0.13 * resonate(resonate(noise, 1.83 * hz, 500), 1.83 * hz, 900)
        add(out, start, amplitude_ratio(db + DRAG_FADE_DB * u) * evened(sing) * signal.windows.tukey(len(u), .2))
    return out


def scene():
    """Cards with their echo, the table, the room and the far tone."""
    low_cut = signal.butter(2, 90, "high", fs=SR, output="sos")
    hits = signal.sosfilt(np.tile(low_cut, (2, 1)), snaps())  # cards are too small for bass
    hits = hits - 0.74 * resonate(hits, 251, 110)  # the table top cancels a low band
    cards = hits + amplitude_ratio(ECHO_DB) * echo(hits) + rubbing() + drags()
    return (cards + table() + room() + far_tone())[None]


def band_limit(x):
    """A steep low-pass at the top of the band."""
    return signal.sosfilt(signal.butter(12, 16660, fs=SR, output="sos"), x)


def record(dry):
    """Rolls off the top treble and finishes the mix."""
    hz = np.linspace(0, SR / 2, 200)
    taps = signal.firwin2(257, hz, amplitude_ratio(read(TREBLE_ROLL_OFF, hz)), fs=SR)
    mix = signal.oaconvolve(dry, taps[None], "same")
    return band_limit(mix)


dry = scene()
out = record(dry)
put_to_file(out)
```